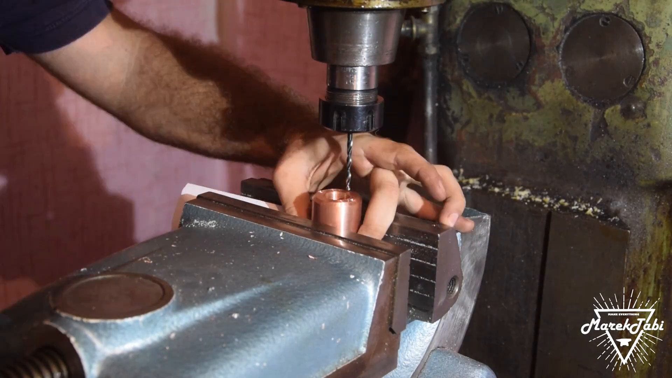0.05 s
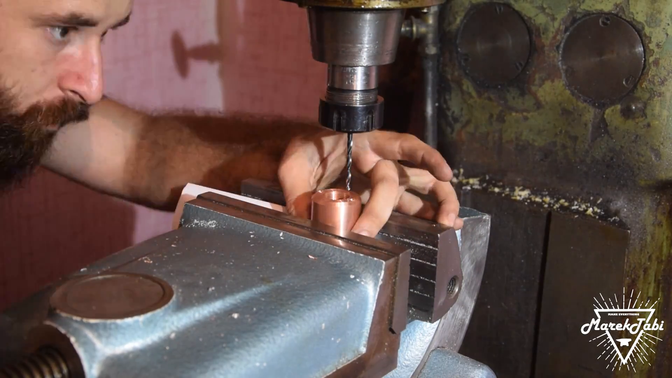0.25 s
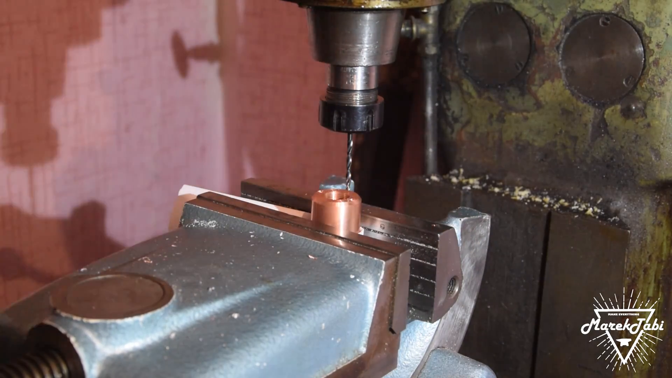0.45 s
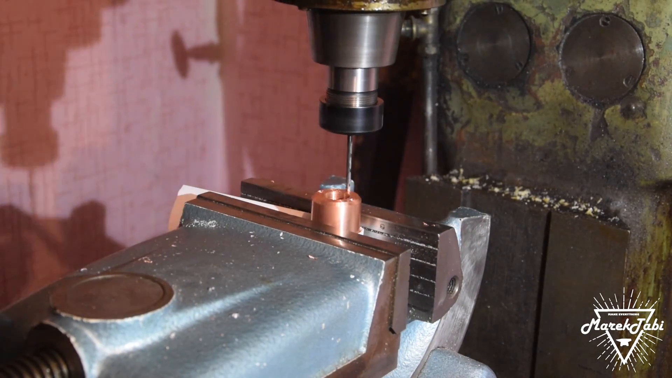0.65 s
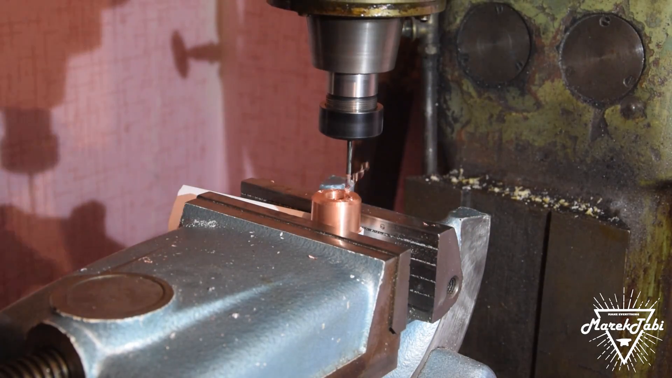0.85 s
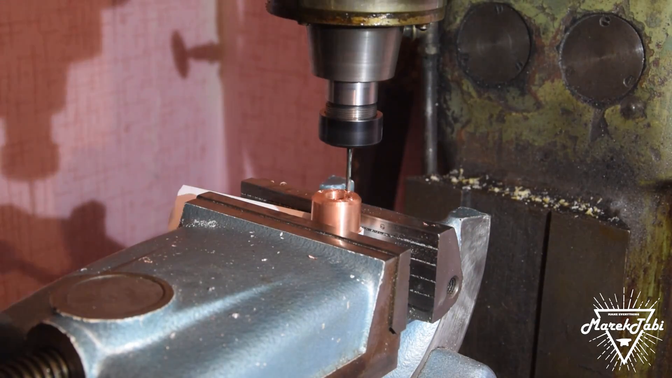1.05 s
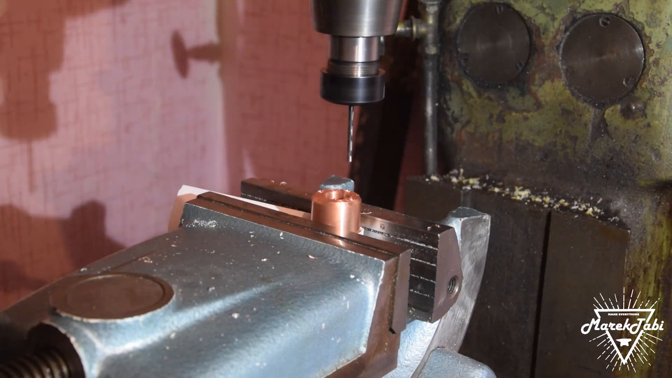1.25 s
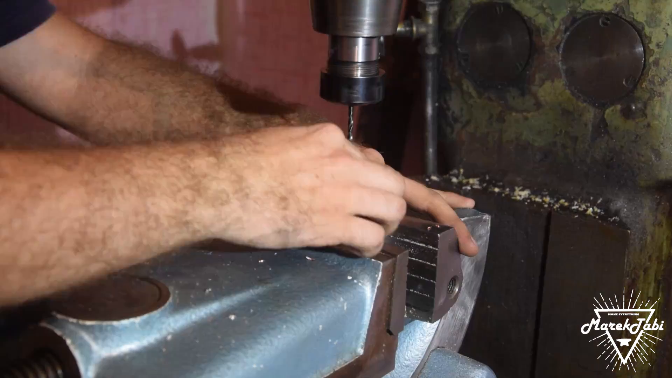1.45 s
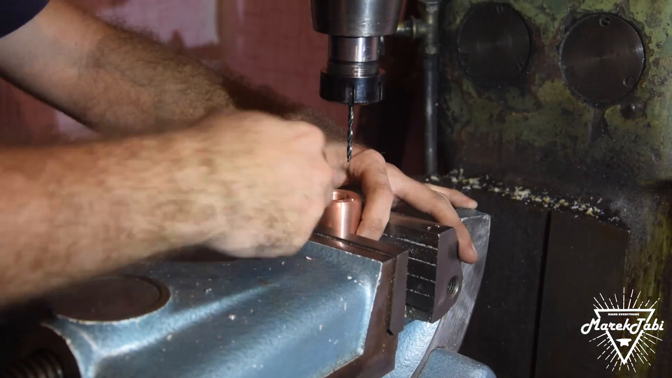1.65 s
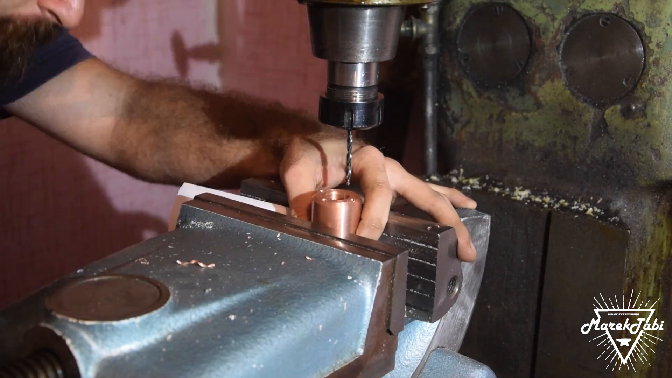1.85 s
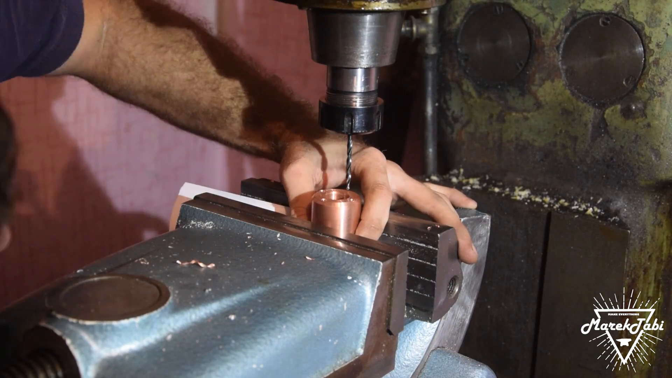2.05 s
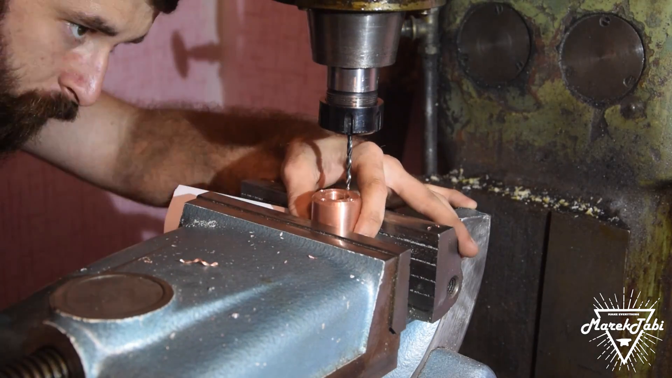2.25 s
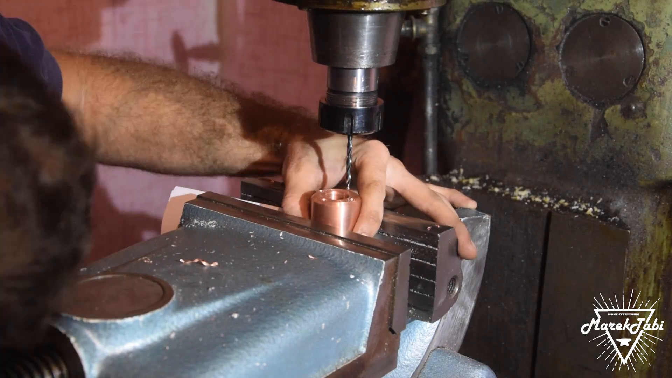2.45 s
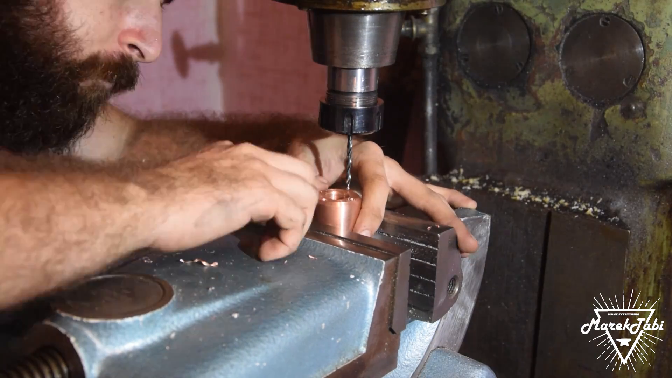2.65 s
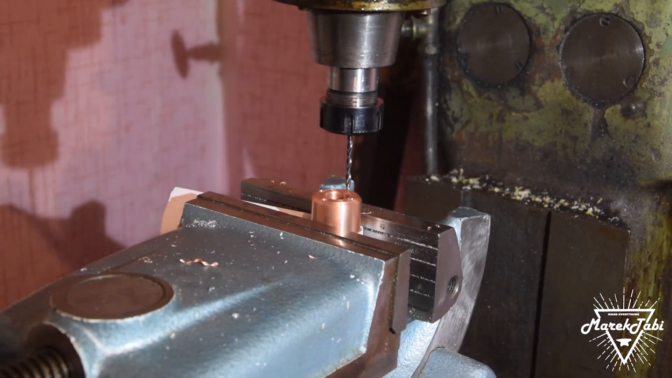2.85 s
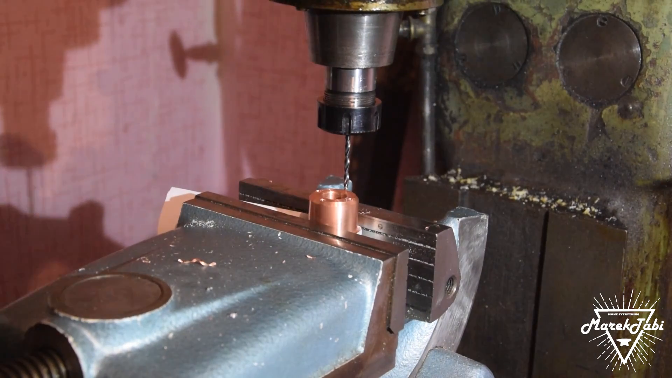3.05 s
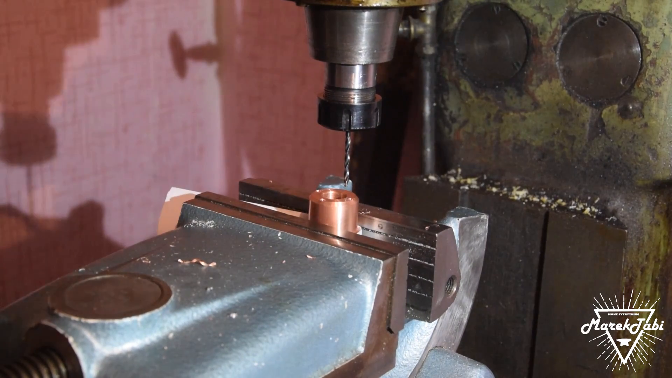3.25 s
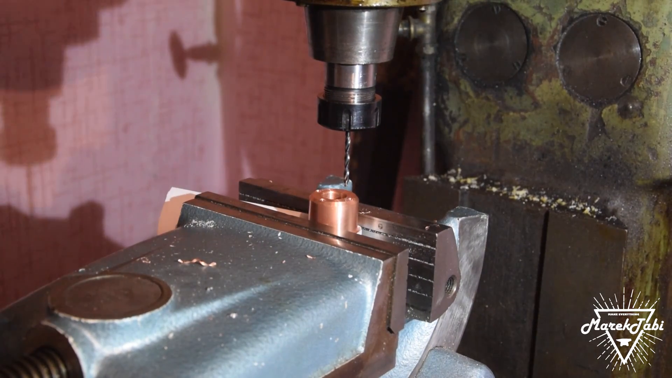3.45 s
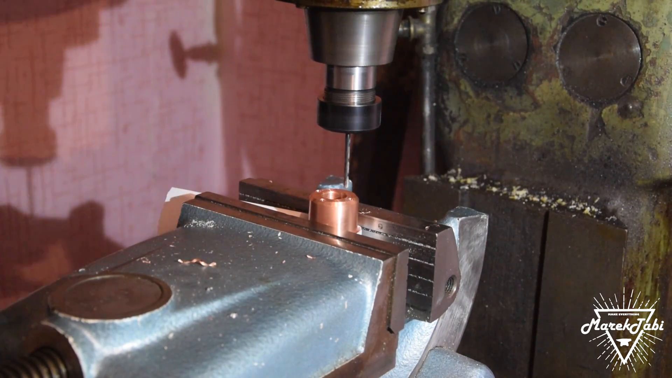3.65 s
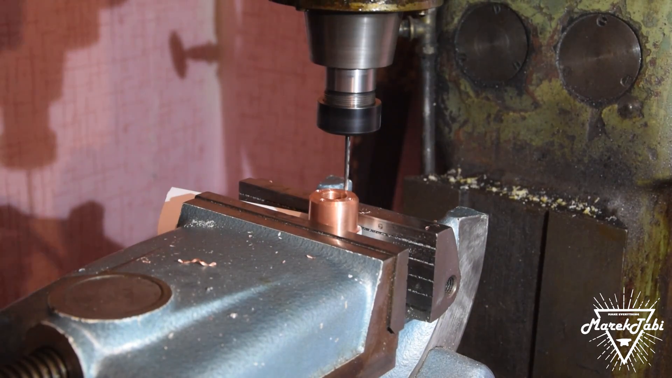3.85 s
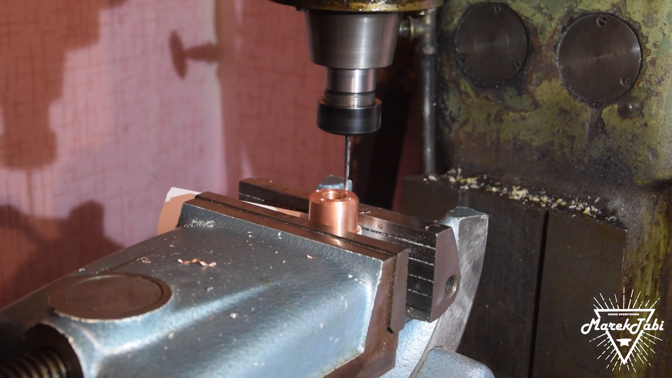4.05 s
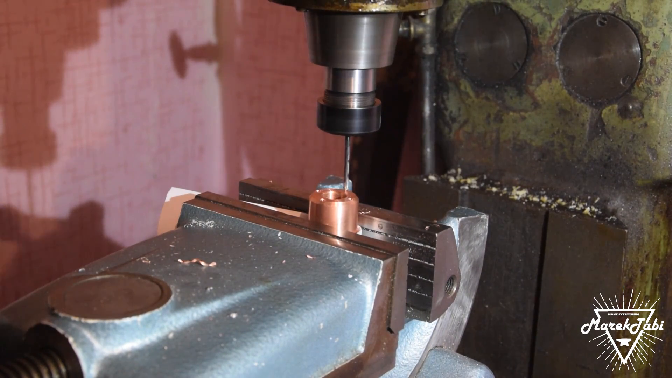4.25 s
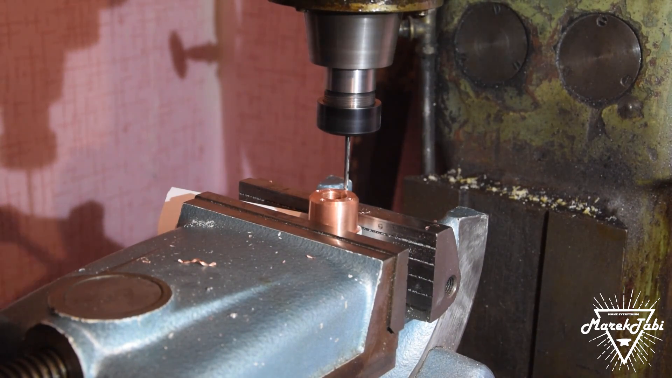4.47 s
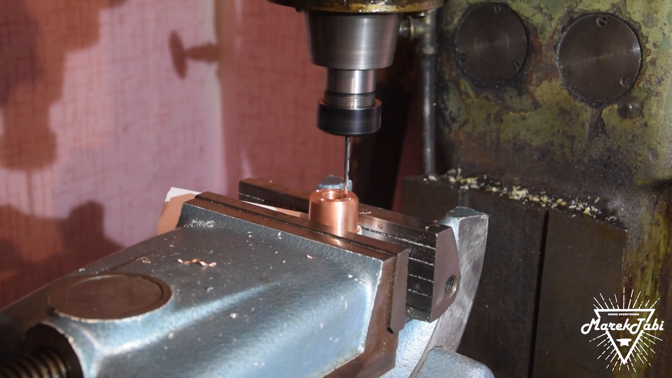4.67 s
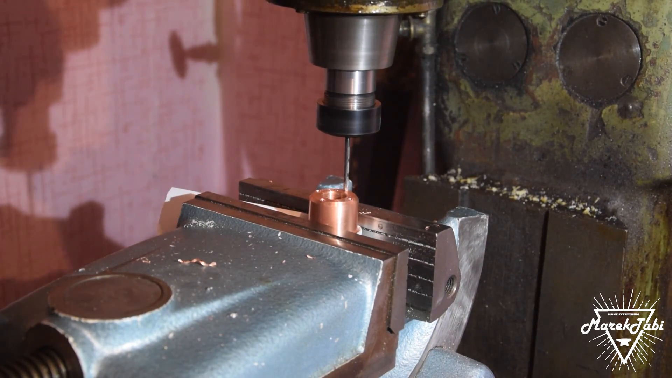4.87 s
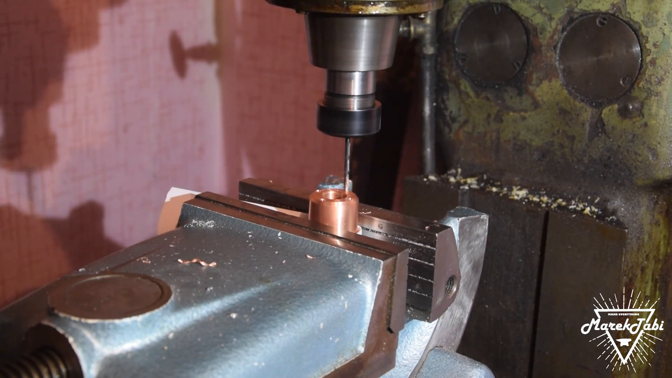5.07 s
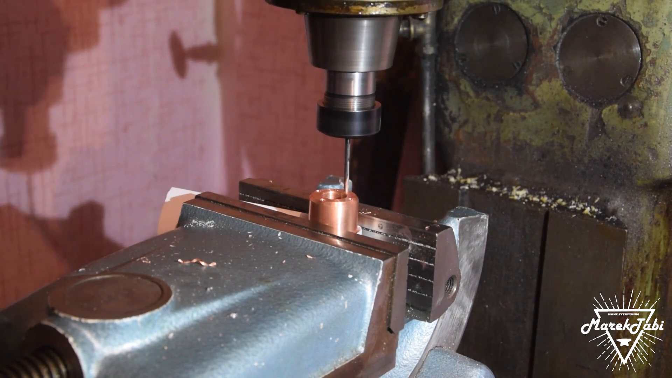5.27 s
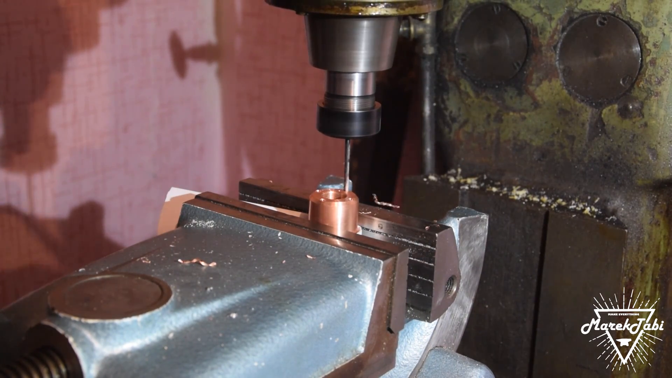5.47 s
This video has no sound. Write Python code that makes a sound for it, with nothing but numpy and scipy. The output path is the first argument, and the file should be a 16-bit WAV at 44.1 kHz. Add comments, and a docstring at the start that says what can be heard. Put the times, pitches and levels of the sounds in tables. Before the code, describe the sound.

Close, dry mono pickup of a small drill in a milling machine. Speeded-up running sounds like thin hiss, with a bright bore of under a second and light touches. Then the pitch falls at once to a steady whirring, humming gearbox. A sharper knock follows, and a second hole starts: coarse, pulsing scrape, chattering metal and ringing squeals, still cutting at the end.

```python
"""A small twist drill bores into copper: the scrape of its lips, hissing chips and a ringing drill.
It is shaped noise and wavering tones, with brief surges where the drill snatches.
Behind it a milling machine runs: motor hum, gear whine and a rattling gearbox, plus light knocks and grazes.
The first hole passes in fast motion, so all machine and drill pitches are raised into a thin hiss.
Then the machine runs at its true speed, and the drill bites into a second hole."""
import sys
import numpy as np
from scipy import signal
from scipy.fft import rfft, irfft, next_fast_len
from scipy.io import wavfile
from scipy.ndimage import map_coordinates

SR = 44100
rng = np.random.default_rng(int(sys.argv[2]) if len(sys.argv) > 2 else 0)


def store_pcm(level_fs):
    """Save levels as 16-bit WAV."""
    pcm = np.round(np.clip(level_fs, -1, 1) * 32767).astype(np.int16)
    wavfile.write(sys.argv[1], SR, np.atleast_2d(pcm).T)


N = 242991

FAST, TRUE = 7.5, 1  # speed of the fast motion and true speed, as factors
TRUE_SPEED_S = 2.9495  # the fast motion ends (s)
SPINDLE_HZ, SHAFT_HZ = 15.2, 71.8  # turns a second of the drill and of a gear shaft, at true speed
TOP_HZ = 15730  # nothing sounds above this
FIRST_TOUCH_S, BACK_OUT_S, SECOND_TOUCH_S = 0.604, 1.282, 3.582  # the drill enters, backs out, enters again


def amp(db):
    """Turn decibels into a gain."""
    return 10 ** (np.asarray(db) / 20)


def unit(x):
    """Scale x to an average strength (rms) of 1."""
    return x / np.sqrt(np.mean(x ** 2) + 1e-20)


def clock():
    """Give the time of each sample in seconds."""
    return np.arange(N) / SR


def curves(rows):
    """Draw one value per sample, in straight lines, for each column after the time."""
    times, *columns = np.transpose(rows)
    return [np.interp(clock(), times, column) for column in columns]


def wobble(rate):
    """Make a smooth random curve through `rate` random points a second."""
    knots = rng.standard_normal(int(N * rate / SR) + 4)
    place = clock() * rate
    k = place.astype(int)
    blend = (1 - np.cos(np.pi * (place - k))) / 2
    return knots[k] * (1 - blend) + knots[k + 1] * blend


def filtered(x, response):
    """Weight each frequency of x by the response."""
    size = next_fast_len(N + 8192)
    frequencies = np.fft.rfftfreq(size, 1 / SR)
    return irfft(rfft(x, size) * response(frequencies), size)[:N]


def through_metal(force, spectrum, resonances, speed):
    """Hear a noisy force through a metal body; fast motion raises all of the body's frequencies."""
    f, db = np.transpose(spectrum)

    def response(hz):
        true_hz = hz / speed
        slope = np.interp(np.log(true_hz + 1), np.log(f + 1), db)
        peaks = sum(lift / (1 + (2 * (true_hz - centre) / width) ** 2)
                    for centre, width, lift in resonances)
        return amp(slope + peaks) * np.sqrt(SR / 2 / speed)  # from dB per Hz to the whole band

    return filtered(unit(force), response)


def tones(lines, speed, drift, waver_db, rate):
    """Add up machine tones, each wavering in phase (drift, radians) and in level."""
    t, out = clock(), np.zeros(N)
    coarse = t[::32]  # the slow wavering needs few points
    for hz, db in lines:
        if hz * speed > TOP_HZ:
            continue
        knots = rng.standard_normal((2, 4096))
        slip, swell = (map_coordinates(k, [coarse * rate * speed], mode="wrap") for k in knots)
        phase = 2 * np.pi * (hz * speed * t + rng.random())
        phase += np.interp(t, coarse, drift * slip)
        level = np.interp(t, coarse, amp(db + waver_db * swell))
        out += level * np.sin(phase)
    return np.sqrt(2) * out  # rms levels to sine peaks


def each_turn(hz):
    """Repeat the same rough force on every turn, as uneven teeth do."""
    one_turn = rng.standard_normal(SR)[:round(SR / hz)]
    return unit(np.resize(one_turn, N))


def bursts(rows):
    """Place dying bursts of noise, each around one resonance."""
    out, t = np.zeros(N + SR), np.arange(SR // 2) / SR
    for s, db, hz, octaves, t60 in rows:
        edges = hz * 2 ** (np.array([-.5, .5]) * octaves)
        band = signal.butter(3, edges, "band", fs=SR, output="sos")
        noise = rng.standard_normal(len(t))
        burst = signal.sosfilt(band, noise * amp(db - 60 * t / t60))
        out[round(s * SR):][:len(t)] += burst / np.std(signal.sosfilt(band, noise))
    return out[:N]


def engagement(touch_s, back_out_s, speed):
    """Tell how fully the drill cuts, 0-1: it sinks in, holds, then eases off until it is clear."""
    entry_s, ease_db_per_s, clear_s = 0.047, 8.5, 2.1  # all at true speed
    sunk = np.clip((clock() - touch_s) * speed / entry_s, 0, 1)
    leaving = np.maximum(clock() - back_out_s, 0) * speed
    return sunk * amp(-ease_db_per_s * leaving) * np.clip(1 - (leaving / clear_s) ** 2, 0, 1)


def snatches(rise, t60):
    """Let the lips snatch at the soft copper: brief surges as gains on cutting force and on ringing."""
    # Snatches. Each row: time in seconds, added cutting force in dB, added ringing in dB,
    # both relative to the steady cut and before the rise and fade below.
    snatch_rows = [(0.611, -6.5, -10), (3.645, 6, -7), (4.035, -25, 8.5), (4.087, -4, 10),
                   (4.307, -12, 13.5), (4.475, -28, 8), (4.579, -14, 10), (4.836, -18, 2), (5.128, -10, 4)]
    gains = np.ones((2, N))
    for s, force_db, ring_db in snatch_rows:
        age = np.maximum(clock() - s + rise, 0)  # starts one rise time early
        shape = amp(-60 * age / t60) * (1 - np.exp(-age / rise))
        gains += amp([[force_db], [ring_db]]) * shape
    return gains


def loaded_hum(contact, speed):
    """Hum of the spindle drive under load; only a full cut loads it."""
    # Hum tones. Each row: pitch in Hz at true speed, level in dB rms before the 2 dB cut below.
    load_tones = [(91, -80), (121.4, -64.5), (152, -75.5), (212.4, -68), (351.6, -62.5)]
    hum = tones(load_tones, speed, drift=0.32, waver_db=2.7, rate=9.7)
    return amp(-2.0) * contact ** 2.1 * hum


def drilling(hole, contact, chatter_lines, speed, flute_db, crumble_db, chip_db, chatter_db, gain_db,
             hiss_gain_db):
    """Two lips scrape the copper in turn; tearing chips shake spindle and vice and hiss in the flutes."""
    # Colour of the scraping. Each row: frequency in Hz at true speed, relative strength in dB per Hz.
    scrape_colour = [(30, -129), (65, -113), (170, -100), (330, -86), (500, -77), (700, -67.5), (2000, -66),
                     (4300, -65), (6000, -70.5), (8000, -76), (10000, -82), (13000, -90), (15500, -83.5)]
    # Resonances of spindle and vice. Each row: centre in Hz and width in Hz at true speed, lift in dB.
    vice = [(402, 11, 9), (589, 39, 3), (682, 12, 5.5), (813, 23, 8), (1120, 207, 8.5), (1422, 12, 10.5),
            (1724, 22, 13.5), (1955, 190, 4.5), (2077, 74, 6.5), (2435, 76, 1.5), (3090, 19, 9.5),
            (4080, 250, 0.5), (6880, 140, 6.5), (8060, 100, 5), (9630, 360, 4)]
    chip_growth = 1.45  # the share of chip hiss grows with this power of the snatching force
    level_db, hiss_db = curves(hole)
    surge, _ = snatches(rise=0.0087, t60=0.099)

    lips_phase = 2 * np.pi * 2 * SPINDLE_HZ * speed * clock()
    lips = np.sin(lips_phase + .5 * wobble(5 * speed))
    load = amp(flute_db * lips + 0.54 * wobble(45 * speed))
    tearing = rng.standard_normal(N) * amp(crumble_db * wobble(900 * speed))
    grooves = 0.43 * each_turn(SPINDLE_HZ * speed)  # the lips meet the marks of the turn before
    scrape = through_metal(tearing + grooves, scrape_colour, vice, speed)
    chatter = amp(chatter_db) * tones(chatter_lines, speed, drift=1, waver_db=1.5, rate=18)
    cut = unit(load * (scrape + chatter))

    # the treble of the cut is taken out and replaced by flickering chip hiss
    treble = filtered(cut, lambda hz: 1 - 1 / (1 + (hz / 9000) ** 12))
    flicker = wobble(500 * speed) + .6 * wobble(35 * speed)
    flying = amp(chip_db * flicker + .6 * lips)
    hiss = unit(filtered(treble * flying, lambda hz: hz / (hz + 1500)))
    chips = amp(hiss_db + hiss_gain_db) * surge ** chip_growth * hiss

    sound = contact * surge * amp(level_db + gain_db) * (cut - treble + chips)
    return sound + loaded_hum(contact, speed)


def ringing_drill(contact, speed, level_db, swell_db):
    """Scraping keeps the drill's bending mode ringing; it swells with the turning and leaps at snatches."""
    # Bending mode of the drill: centre in Hz and width in Hz, at true speed.
    drill_mode = (1160, 76)
    swell_turns, swell_at_s = 2, 4.32  # swells on every second turn; time of one crest
    _, kick = snatches(rise=0.0039, t60=0.13)
    swell_hz = SPINDLE_HZ / swell_turns * speed
    swell = np.cos(2 * np.pi * swell_hz * (clock() - swell_at_s))
    centre, width = speed * np.array(drill_mode)

    def mode(hz):
        damping = 1j * hz * width
        return (damping / (centre ** 2 - hz ** 2 + damping)) ** 2

    swing = signal.hilbert(unit(filtered(rng.standard_normal(N), mode)))
    held = unit(swing.real / np.sqrt(1 + np.abs(swing) ** 2))  # the wall of the hole limits the swing
    return amp(level_db + swell_db * swell) * contact ** 2 * kick * held


def wall_rub():
    """The flutes rub the wall on the way out, as two dying bands of noise."""
    # Rubbing bands. Each row: starting level in dB, pitch in Hz, bandwidth in octaves,
    # time to fade by 60 dB in seconds.
    rub_bands = [(-65.5, 890, 0.42, 0.74), (-44, 4500, 0.27, 0.63)]
    return bursts([(BACK_OUT_S, *band) for band in rub_bands])


def knocks_and_grazes():
    """Light knocks and grazes on the vice and workpiece, each a dying burst of noise."""
    # Knocks and grazes. Each row: start in seconds, starting level in dB, pitch in Hz,
    # bandwidth in octaves, time to fade by 60 dB in seconds.
    touch_rows = [(0.591, -50, 4800, .5, .05), (1.061, -52.5, 866, 0.44, 0.035),
                  (1.538, -57, 3300, 0.25, 0.045), (2.016, -52, 5600, 0.25, 0.071),
                  (2.659, -63, 866, 0.59, 0.058), (2.82, -57, 2890, 1, 0.021),
                  (2.915, -62.5, 850, 0.5, 0.33), (3.488, -36.5, 1470, 2.3, 0.18)]
    return bursts(touch_rows)


def machine(speed, hum_db, bearings_db, teeth_db):
    """Motor hum, gear whine and the rattle of teeth and bearings in the housing."""
    # Hum of motor and shafts. Each row: pitch in Hz at true speed, level in dB rms before hum_db.
    motor = [(71.8, -87.5), (104, -94.5), (111.3, -85), (117.4, -89.5), (130.3, -87), (208.9, -69),
             (252.7, -72.5), (287.9, -83), (403.9, -76.5), (430.7, -85.5), (494.6, -71.5), (506, -75),
             (575.7, -71.5), (608, -73), (785.4, -74)]
    # Whine of the gears. Each row: pitch in Hz at true speed, level in dB rms.
    gears = [(863.5, -52), (935.2, -60), (1034.8, -60), (1056.9, -59.5), (1091.1, -59.5), (1106.7, -62),
             (1137.8, -60), (1178.1, -63), (1250.2, -67.5), (1321.5, -76.5), (1355.9, -58), (1427.4, -58),
             (1499.5, -66), (1571, -54), (1642.8, -55), (1748.5, -63), (1820.2, -61), (1892, -64.5),
             (1963.7, -61.5), (2035.6, -60)]
    # Higher overtones of the gear teeth. Each row: pitch in Hz at true speed, level in dB rms.
    overtones = [(2288, -59), (2514, -68.5), (2611, -62.5), (2681, -53), (2751, -62.5), (2875, -73),
                 (3074, -68), (3144, -64), (3391, -60.5), (3467, -65), (3714, -62.5), (3790, -60),
                 (4107, -60), (4177, -62), (4323, -65), (4576, -73), (4893, -67), (5109, -72), (5286, -67),
                 (5356, -61), (5432, -59), (5534, -68), (5679, -62.5), (5825, -55), (6072, -62),
                 (6218, -58.5), (6288, -69), (6395, -77)]
    # Rumble of the gearbox. Each row: frequency in Hz at true speed, dB per Hz before the resonances
    # and bearings_db.
    gearbox = [(30, -131), (60, -125), (170, -113), (210, -90.5), (330, -103), (750, -94), (1000, -90),
               (2000, -83.5), (4500, -91), (6300, -87), (7500, -98.5), (9000, -99), (15500, -99.5)]
    # Resonances of its housing. Each row: centre in Hz and width in Hz at true speed, lift in dB.
    housing = [(115.4, 44, 12), (378, 68, 10.1), (501, 52, 9.7), (593, 60, 14), (680, 82, 7.9),
               (928, 57, 11), (1044, 44, 15.3), (1146, 84.0, 14.2), (1324, 120, 9), (1666, 38, 15),
               (2720, 360, 4.2), (5500, 1400, 7.1), (10630, 360, 8.2), (11540, 500, 7.4)]

    hum = tones(motor, speed, drift=.12, waver_db=.8, rate=6)
    whine = tones(gears, speed, drift=0.11, waver_db=1.13, rate=7)
    whine += tones(overtones, speed, drift=0.19, waver_db=2.5, rate=7.7)
    mesh = 1 + 0.23 * np.sin(2 * np.pi * SHAFT_HZ * speed * clock())  # swells once a shaft turn
    unsteady = amp(1.2 * wobble(150 * speed) + .5 * wobble(4 * speed))
    bearings = rng.standard_normal(N) * mesh * unsteady
    teeth = each_turn(SHAFT_HZ * speed) + 0.98 * each_turn(SPINDLE_HZ * speed)
    rattle = through_metal(bearings + amp(teeth_db) * teeth, gearbox, housing, speed)
    return amp(hum_db) * hum + whine + amp(bearings_db) * rattle


def scene():
    """Fast motion over the first hole, then a sudden change to true speed."""
    # Feed into each hole. Each row: time in seconds, cutting level in dB before gain_db,
    # hiss of the chips relative to it in dB before hiss_gain_db.
    first_hole = [(0.64, -30.5, -4), (0.768, -28, -5), (0.988, -28.5, -2), (1.29, -29.5, -5.5)]
    second_hole = [(3.74, -26, -15.5), (3.8, -26.5, -15), (4.68, -26, -15), (5.4, -25, -13),
                   (5.42, -24.5, -14.5)]
    # Chatter of the drill in each hole. Each row: pitch in Hz at true speed, level in dB
    # relative to the other tones and the scrape, before chatter_db.
    first_chatter = [(578, -50), (593, -63), (607, -51), (669, -60), (787.4, -47.5), (1166, -41.5),
                     (1355.4, -44.5), (1424, -57.5), (1684.6, -45.5), (2063.5, -54)]
    second_chatter = [(578, -53.5), (593, -50), (669.5, -54), (788, -46), (864, -52.5), (1166, -41),
                      (1259, -59), (1357, -45), (1408, -47.5), (1618, -52), (1993, -45), (2465, -46.5),
                      (2815, -68), (2889, -47), (3379, -60), (4011, -49), (4204, -45)]

    contact = engagement(FIRST_TOUCH_S, BACK_OUT_S, FAST)
    fast = drilling(first_hole, contact, first_chatter, FAST, flute_db=0.0, crumble_db=2.5, chip_db=2,
                    chatter_db=-.5, gain_db=-0.07, hiss_gain_db=2.5)
    fast += ringing_drill(contact, FAST, level_db=-38, swell_db=5)
    fast += machine(FAST, hum_db=-0.2, bearings_db=0.5, teeth_db=-8.5)

    contact = engagement(SECOND_TOUCH_S, np.inf, TRUE)  # it never backs out
    true = drilling(second_hole, contact, second_chatter, TRUE, flute_db=1, crumble_db=1.0, chip_db=1.8,
                    chatter_db=0.5, gain_db=-1.43, hiss_gain_db=3.5)
    true += ringing_drill(contact, TRUE, level_db=-37, swell_db=1.5)
    true += machine(TRUE, hum_db=1.5, bearings_db=2.5, teeth_db=-6)

    running = np.where(clock() < TRUE_SPEED_S, fast, true)
    return (running + wall_rub() + knocks_and_grazes())[None]


def record(dry):
    """Keep nothing above the band limit."""
    return filtered(dry[0], lambda hz: hz < TOP_HZ)[None]


dry = scene()
out = record(dry)
store_pcm(out)
```